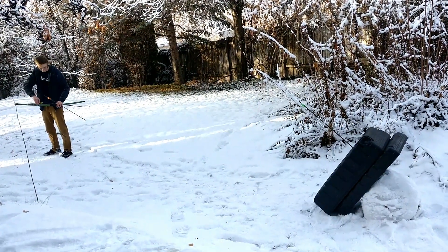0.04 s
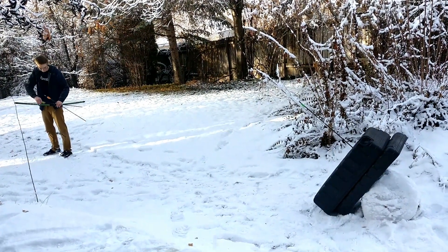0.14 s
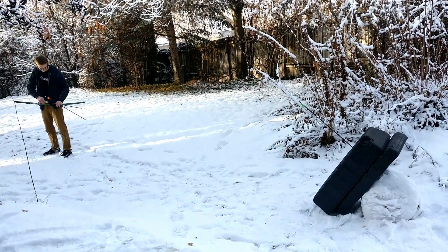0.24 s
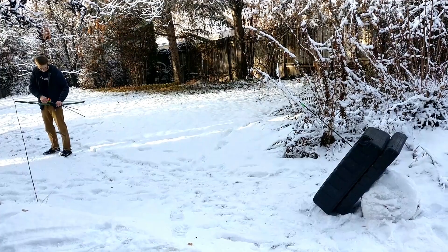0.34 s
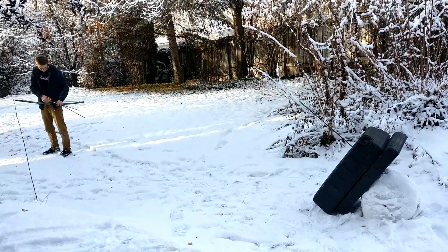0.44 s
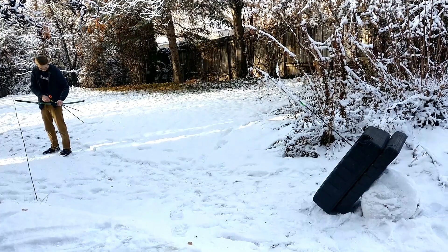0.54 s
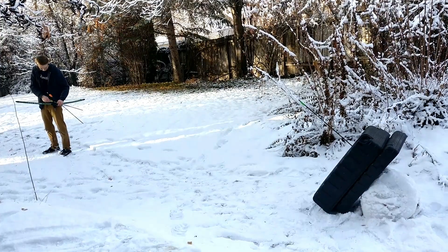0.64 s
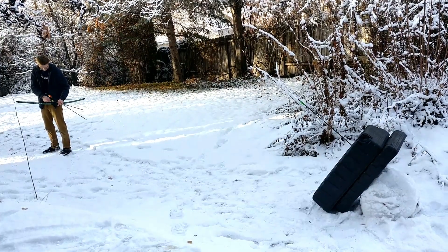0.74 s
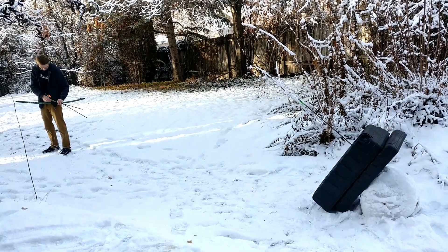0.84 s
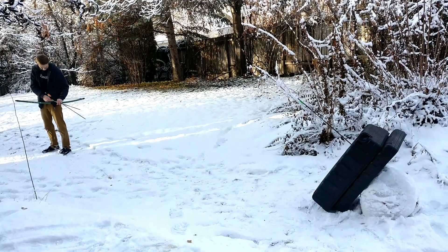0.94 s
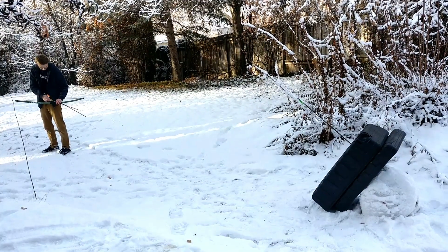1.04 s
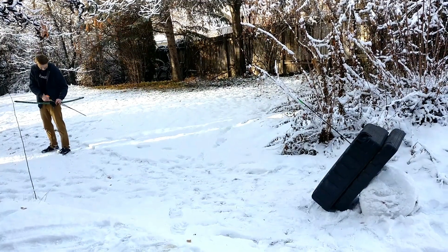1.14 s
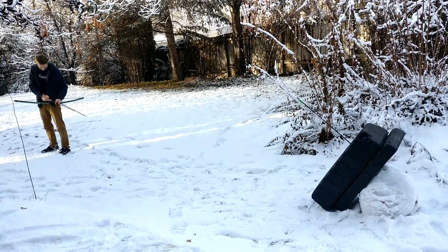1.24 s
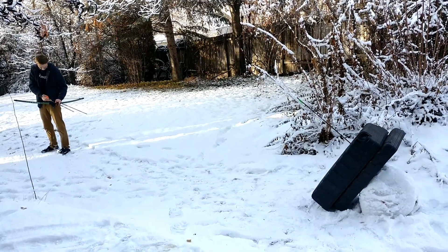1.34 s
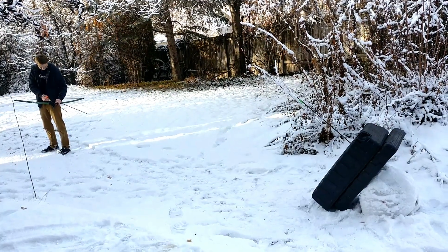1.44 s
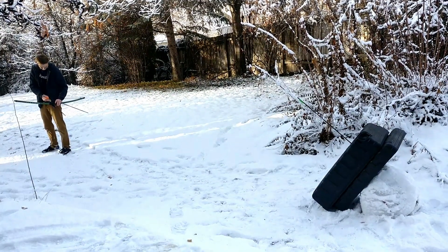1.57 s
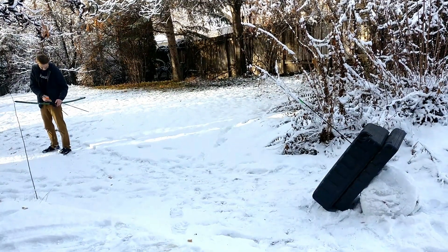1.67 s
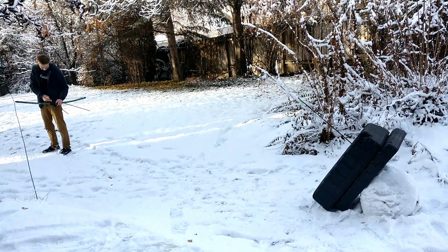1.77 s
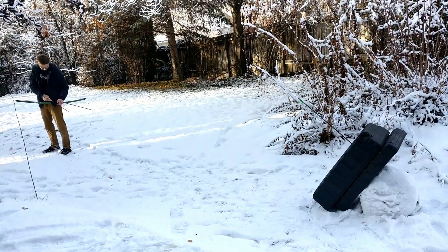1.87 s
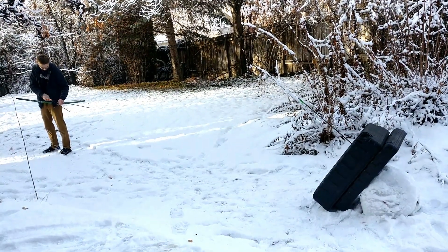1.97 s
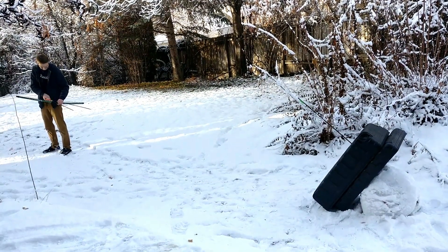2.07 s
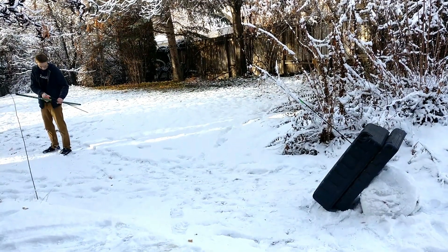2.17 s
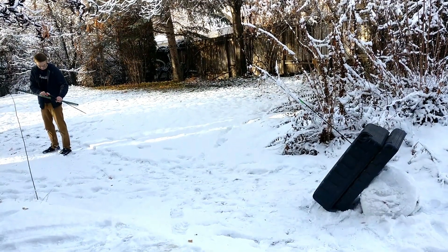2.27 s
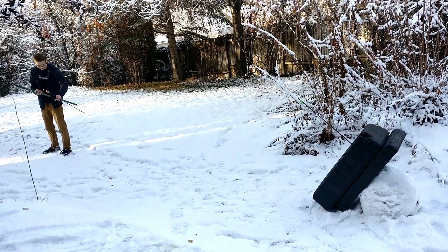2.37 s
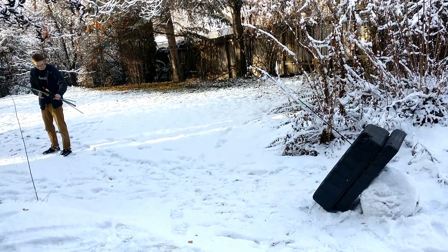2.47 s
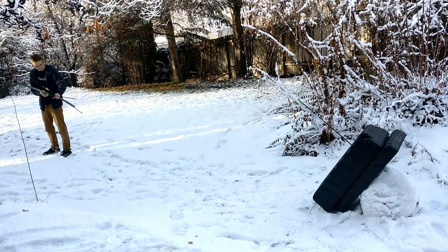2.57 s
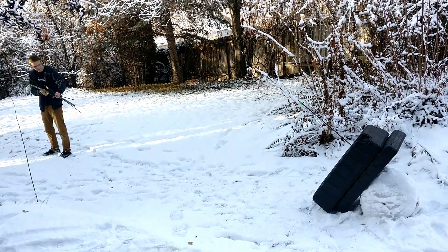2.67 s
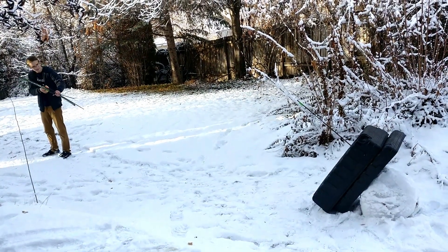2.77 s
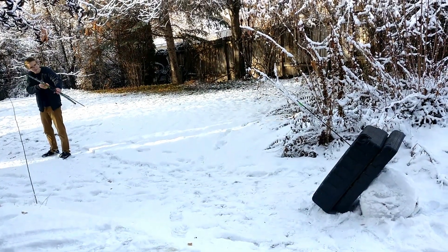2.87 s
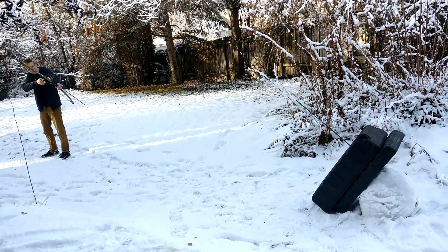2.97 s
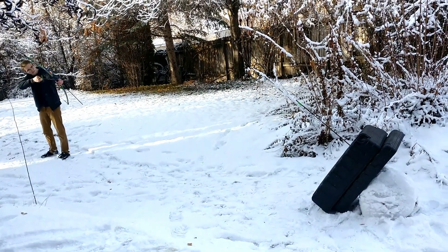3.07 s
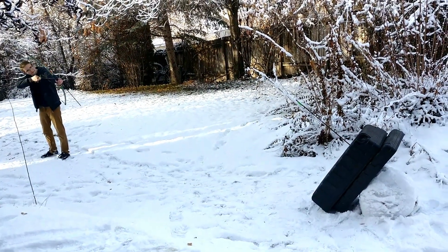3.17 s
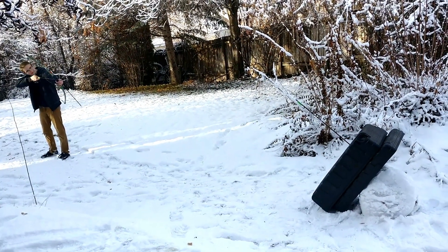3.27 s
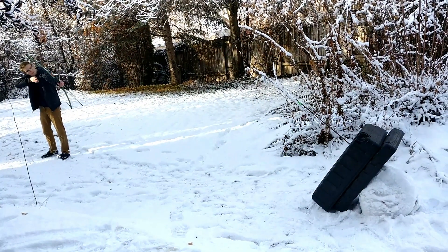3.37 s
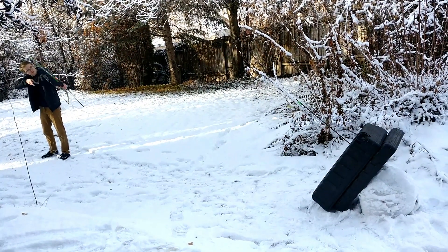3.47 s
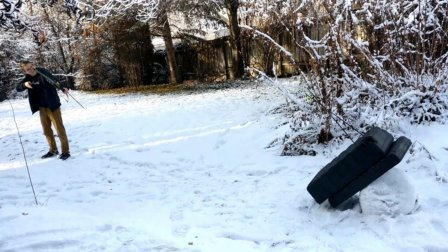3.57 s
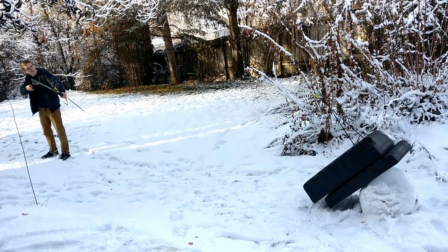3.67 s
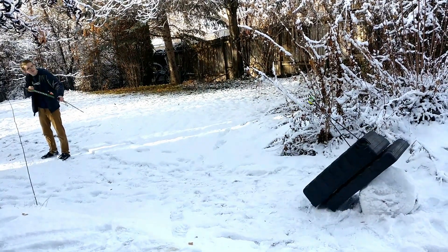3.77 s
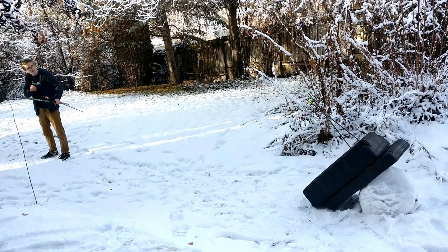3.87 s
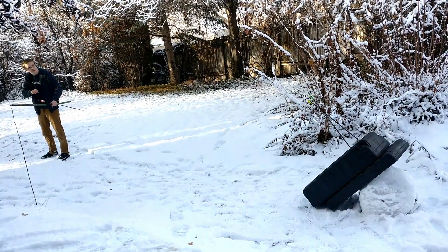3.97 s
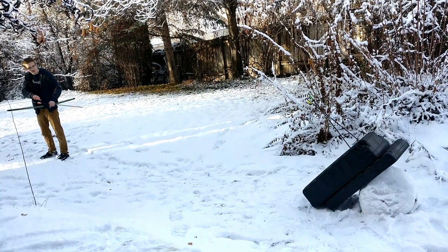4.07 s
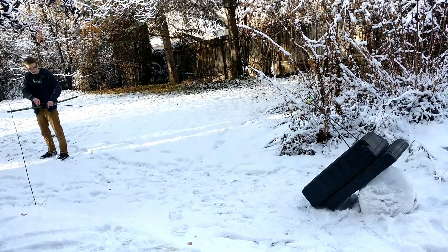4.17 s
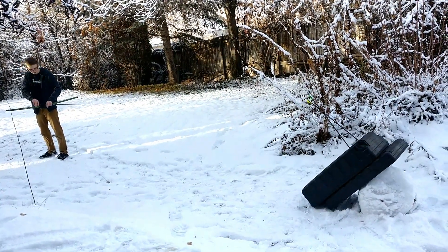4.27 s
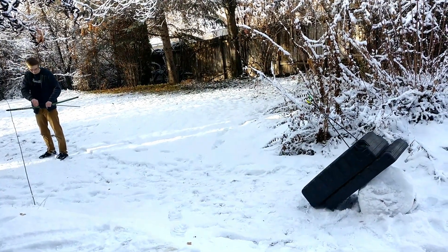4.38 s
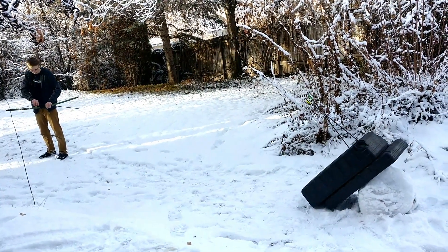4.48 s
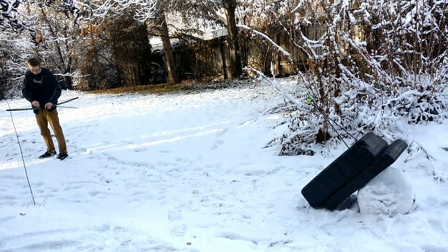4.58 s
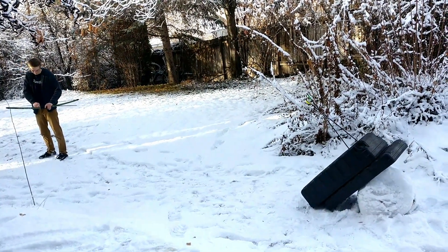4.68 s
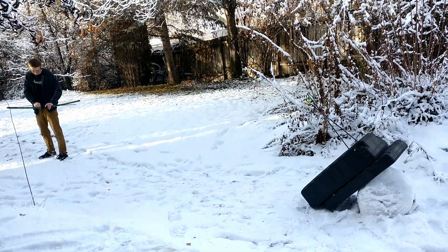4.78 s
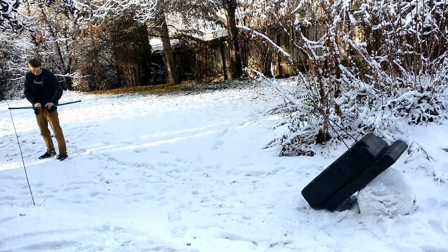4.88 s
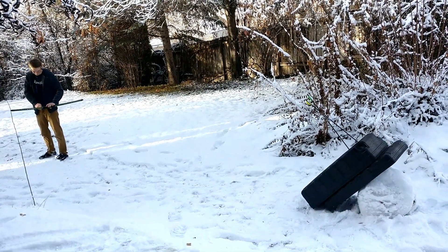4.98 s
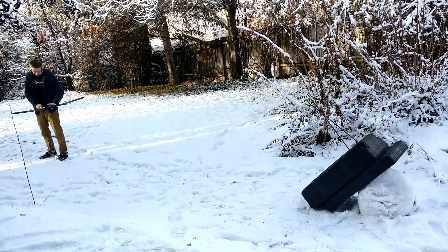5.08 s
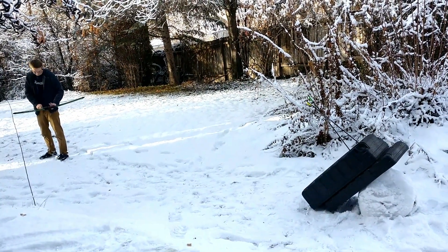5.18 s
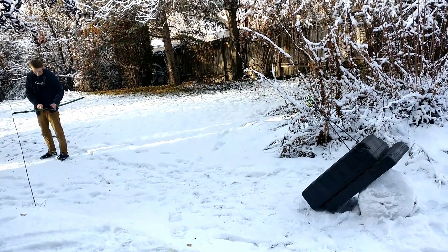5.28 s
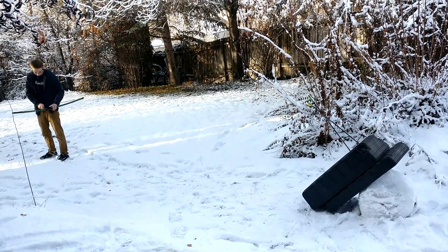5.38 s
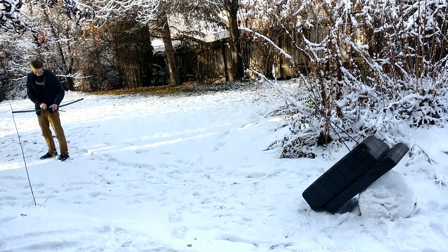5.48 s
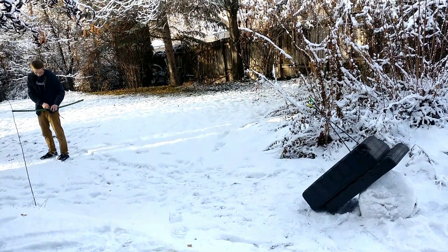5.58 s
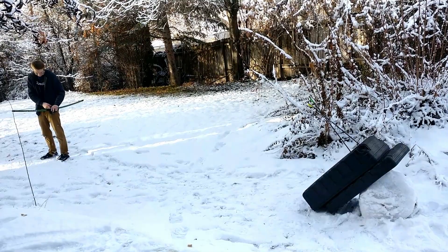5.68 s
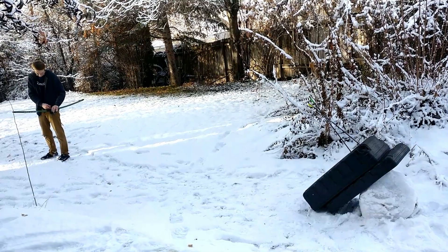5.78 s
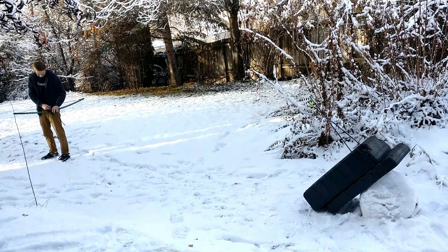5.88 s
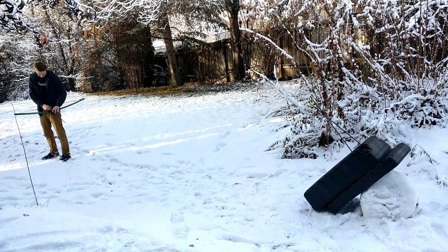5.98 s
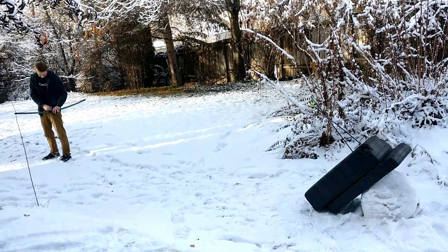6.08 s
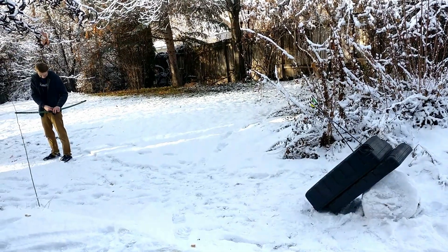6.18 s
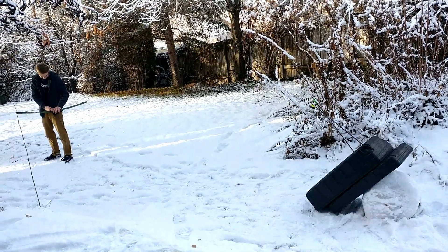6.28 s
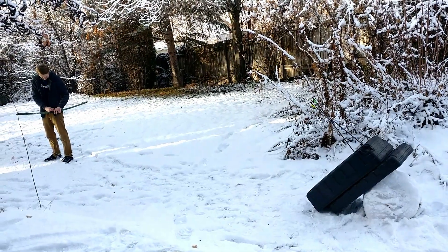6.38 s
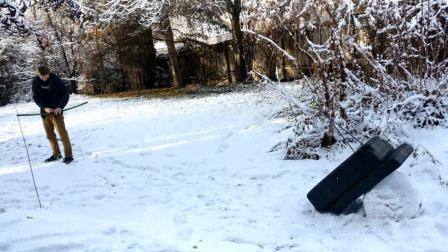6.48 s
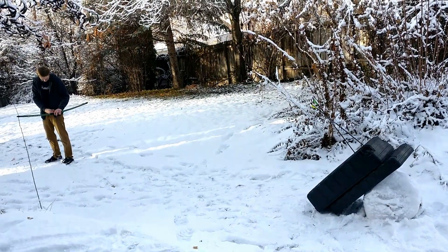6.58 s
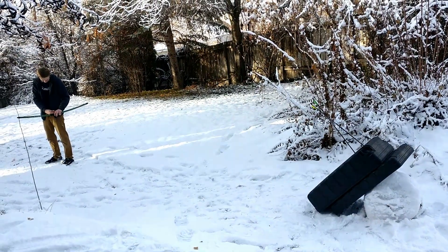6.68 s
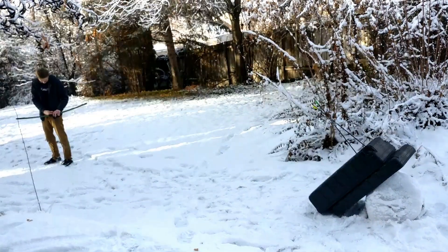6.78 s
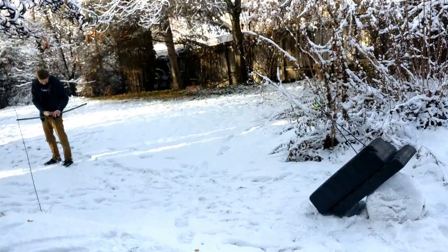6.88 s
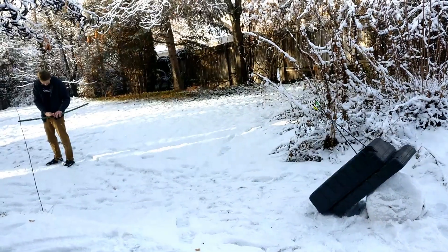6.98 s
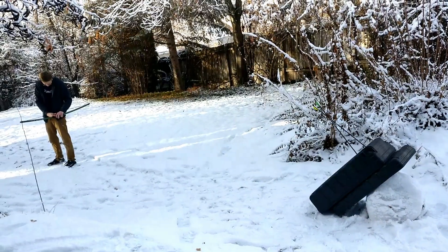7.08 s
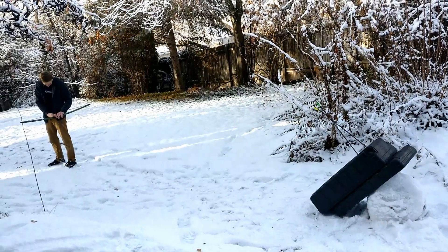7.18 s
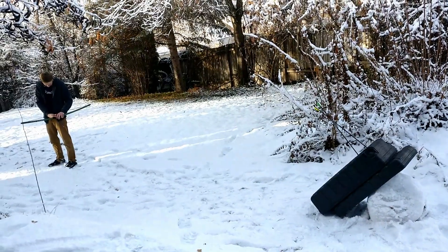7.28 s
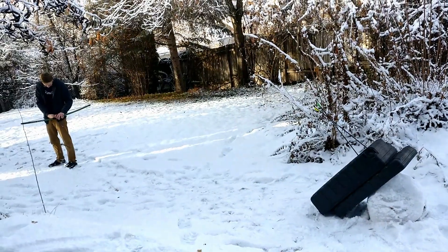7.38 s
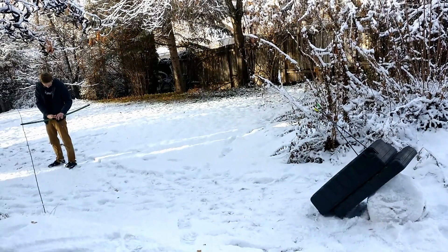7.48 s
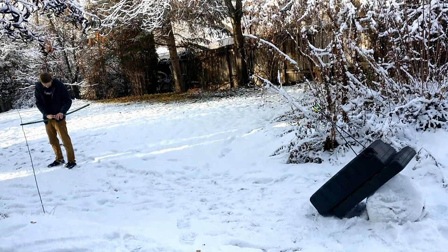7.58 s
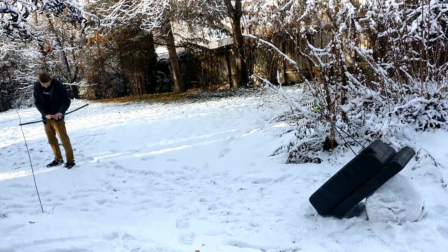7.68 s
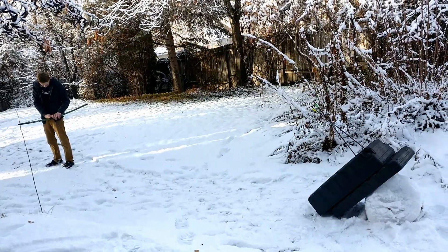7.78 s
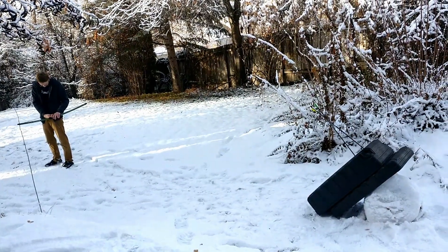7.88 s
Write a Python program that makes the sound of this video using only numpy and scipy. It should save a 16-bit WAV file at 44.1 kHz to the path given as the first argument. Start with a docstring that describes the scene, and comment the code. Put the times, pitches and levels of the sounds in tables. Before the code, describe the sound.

Outdoors in winter, an archer stands some way off, barely audible through soft cloth movements. Far traffic rumbles beneath irregular crisp drips, and an engine briefly hums. A short airy bow release leads at once into a harsh, clipped crack at a nearby hollow target block, which rocks and scrapes on packed snow with clattering slaps and low thumps. Calm returns, with ticks, faint creaks and light clicks of arrows or bow, in stereo.

```python
"""An arrow smacks a hollow block in a snowy yard, slaps and rattles; the block rocks, slides and thuds.
The release is swelling crackly noise; slaps are ragged noise driving shaft modes, thuds soft pushes
ringing block modes. Behind: far traffic and hiss as diffuse noise, a fuzzy engine tone, melt ticks as
snaps with fizz, rustles of grainy noise, and clacks, pips and creaks as rubs or slips through
resonances. A two-port microphone clips on the smack."""
import sys
import numpy as np
from scipy import signal
from scipy.fft import rfft, irfft, next_fast_len
from scipy.io import wavfile
from scipy.ndimage import uniform_filter1d

SR = 44100
rng = np.random.default_rng(int(sys.argv[2]) if len(sys.argv) > 2 else 0)


def file_out(sig):
    """Save sig as 16-bit WAV at sys.argv[1]."""
    # one column per channel
    cols = np.atleast_2d(sig).T
    # limit, then scale
    lim = np.clip(cols, -1, 1)
    pcm = np.round(lim * 32767).astype(np.int16)
    wavfile.write(sys.argv[1], SR, pcm)


N = 349713


def gain_of(db):
    """Decibels to gain."""
    return 10 ** (np.asarray(db) / 20)


def evened(x):
    """Scales to rms 1."""
    return x / np.sqrt(np.mean(x ** 2) + 1e-20)


def read(points, hz):
    """Reads a spectrum on a log-frequency axis."""
    f, value = np.transpose(points)
    return np.interp(np.log(hz + 1), np.log(f + 1), value)


def add(mix, s, sound):
    """Mixes a two-channel sound in at time s."""
    part = mix[:, round(s * SR):][:, :sound.shape[1]]
    part += sound[:, :part.shape[1]]


def coloured(x, gain_db):
    """Filters the last axis by a function of frequency giving dB."""
    hz = np.fft.rfftfreq(x.shape[-1], 1 / SR)
    return irfft(rfft(x) * gain_of(gain_db(hz)), x.shape[-1])


def sides(pan_db):
    """Left and right gains of a level difference."""
    return gain_of(np.array([[.5], [-.5]]) * pan_db)


def ring(modes, t):
    """Sum of dying modes, neighbours in opposite phase, each at a slightly shifted pitch."""
    shifts = rng.uniform(-.012, 0.018, len(modes))
    total = 0
    for k, (hz, db, t60_s) in enumerate(modes):
        tone = np.sin(2 * np.pi * hz * (1 + shifts[k]) * t)
        total = total + (-1) ** k * gain_of(db - 60 * t / t60_s) * tone
    return total


def favour(modes, spot_hz, db_per_octave):
    """The spot that is struck favours the modes near its pitch."""
    return [(hz, db - db_per_octave * abs(np.log2(hz / spot_hz)), t60_s) for hz, db, t60_s in modes]


def swell(top_s, db, rise_s, hold_s, fade_db_per_s, length_s):
    """Level curve of rise, hold and steady fade; length counts from the top."""
    rise_s, length_s = max(rise_s, .002), max(length_s, hold_s + .005)
    end_db = db - fade_db_per_s * (length_s - hold_s)
    return [(top_s - rise_s, db - 17), (top_s, db), (top_s + hold_s, db), (top_s + length_s, end_db)]


def stretch(curve, spectrum, grain_db):
    """Crackly noise on a level curve: a few grains stand well out."""
    s, db = np.transpose(curve)
    t = np.arange(s[0], s[-1], 1 / SR)
    sizes = gain_of(grain_db * np.minimum(rng.exponential(1, len(t) // 80 + 2), 4))
    grains = np.interp(np.arange(len(t)) / 80, np.arange(len(sizes)), sizes)
    noise = coloured(rng.standard_normal((2, len(t))) * grains, lambda f: read(spectrum, f))
    level = gain_of(2.5 + np.interp(t, s, db))  # 2.5 dB above the curve
    return s[0], evened(noise) * level * signal.windows.tukey(len(t), .05)


def wash(spectrum, patchy_db, shared_db):
    """Diffuse noise, its level varying by chance over time and frequency, partly shared by all bands."""
    # left-right likeness: (frequency [Hz], correlation [1])
    likeness = [(60, 0.97), (180, 0.97), (550, 0.53), (1650, -0.22), (4970, -0.03), (15000, 0.37)]
    frames, hz = N // 256 + 5, np.fft.rfftfreq(1024, 1 / SR)
    a, b, c, d, patches = rng.standard_normal((frames, 513, 5)).T
    shared = evened(uniform_filter1d(rng.standard_normal(frames), size=5))
    patches = evened(uniform_filter1d(uniform_filter1d(patches, 10, 0), 12, 1))
    same = np.clip(read(likeness, hz), -1, 1)[:, None]
    left = a + 1j * b
    right = same * left + np.sqrt(1 - same ** 2) * (c + 1j * d)
    z = np.array([left, right]) * gain_of(patchy_db * patches + shared_db * shared)
    x = signal.istft(z, nperseg=1024, noverlap=768)[1][:, :next_fast_len(N)]
    return evened(coloured(x, lambda f: read(spectrum, f))[:, :N])


def yard():
    """Three traffic layers on their own swells over an unsteady hiss."""
    # far traffic: (time [s], rumble [dB], engine drone [dB], tyre wash [dB])
    traffic = [(0.0, -48.5, -55.5, -59.5), (0.77, -46.5, -57, -57), (1.27, -44, -56, -55),
               (1.8, -44, -57.5, -52.5), (2.3, -43.5, -54.5, -55), (2.59, -49, -54.5, -55.5),
               (3.0, -46, -52, -54.5), (3.4, -45, -51.5, -57), (4.1, -44.5, -52, -56.5),
               (4.55, -46.5, -59, -60), (5.3, -47.5, -58, -58.5), (6.4, -49, -59, -60),
               (7.0, -49.5, -54, -59), (7.59, -48, -53, -54), (7.93, -53.5, -56, -56)]
    # noise spectra: (frequency [Hz], relative density [dB per Hz])
    rumble_spectrum = [(12, -48), (20, -23), (48, 2.5), (81, 4), (101, 3), (134, -10), (208, -15.5),
                       (278, -23.5), (400, -21.5), (520, -55), (880, -120)]
    drone_spectrum = [(90, -30), (130, 1.5), (200, 0), (280, -7.5), (400, -35)]
    tyre_spectrum = [(150, -34.5), (250, -13.5), (467, -6.5), (908, -2.5), (1300, -7.5), (1810, -8),
                     (4720, -30), (6000, -39.5), (7800, -52), (13200, -120)]
    hiss_spectrum = [(1470, -29), (2500, 1), (4740, -5), (6000, -5), (6700, -12.5), (7550, -21.5),
                     (9490, -8.5), (13700, -7.5), (15100, -12.5), (16100, -2.5), (16500, -37)]
    hiss_db = -65
    s, *levels = np.transpose(traffic)
    rumble, drone, tyres = (gain_of(np.interp(np.arange(N) / SR, s, db)) for db in levels)
    out = rumble * wash(rumble_spectrum, 0.41, .1)
    out += drone * wash(drone_spectrum, .8, .1)
    out += tyres * wash(tyre_spectrum, 1.7, .4)
    return out + gain_of(hiss_db) * wash(hiss_spectrum, 3.4, 1.6)


def engine():
    """A passing engine's fuzzy tone: a carrier on the pitch curve under slow chance swings."""
    # engine note: (time [s], pitch [Hz], level [dB])
    note = [(1.199, 206.6, -52.5), (1.4, 222.4, -56.5), (1.55, 215.1, -49), (1.75, 200, -50),
            (1.95, 187.8, -52.5), (2.2, 185, -56)]
    s, hz, db = np.transpose(note)
    t = np.arange(s[0], s[-1], 1 / SR)
    swing = uniform_filter1d(uniform_filter1d(rng.standard_normal((len(t), 2)).T, 900), 900)
    carrier = np.exp(2j * np.pi * np.cumsum(np.interp(t, s, hz)) / SR)
    tone = ((swing[0] + 1j * swing[1]) * carrier).real
    level = gain_of(np.interp(t, s, db)) * signal.windows.tukey(len(t), .3)
    return s[0], evened(tone) * level * np.ones((2, 1))


def tick(db, pan_db, ring_hz, body_db, fizz_db):
    """A millisecond snap and a spit of fizz, with a hint of pitch from the twig or crust."""
    t = np.arange(4096) / SR

    def spit_db(f):
        below_treble = body_db * np.clip(np.log2(8000 / (f + 1)), 0, 2)
        pitch = 9 / (1 + ((f - ring_hz) / 350) ** 2)
        return -40 * (f < 1900) + below_treble - 7 * (abs(f - 7700) < 1000) + pitch

    spit = coloured(rng.standard_normal((2, len(t))), spit_db)
    snap = np.exp(-((t - .0013) / 0.00033) ** 2)
    decay = gain_of(-60 * t / .045) + gain_of(-14 - 60 * t / 0.32)  # short fizz and a weaker tail
    fizz = (1 - np.exp(-t / 0.00054)) * decay
    return gain_of(db - 3) * sides(pan_db) * evened(spit) * (snap + gain_of(fizz_db) * fizz)


def melt():
    """Drips and falling snow crumbs: clear ticks and a scatter of fainter, softer ones."""
    # clear ticks: (time [s], nominal peak [dB], left-right [dB], ring [Hz],
    # gain below the treble [dB per octave])
    ticks = [(0.0695, -42, -3, 2020, -2.5), (0.1113, -39, 0.5, 2380, 0), (0.2289, -44, -11, 2050, -8),
             (0.6424, -42.5, 6, 5360, -15), (0.766, -39.5, -9, 4400, -3.5), (0.794, -36, 1, 6600, -8),
             (1.006, -47.5, -8, 2900, 7), (1.12, -46, 9, 2450, -6), (1.418, -40, 8.5, 3300, 2),
             (1.7699, -47, -2, 3550, 6), (1.8358, -42, -0.5, 2430, -1.5), (1.9666, -40.5, 3, 2470, 5),
             (2.1378, -45, -0.5, 3410, -5), (2.212, -41, 0, 3520, -6), (2.491, -38.5, 0, 2240, -3),
             (2.58, -35, 6, 3520, 0), (2.7322, -41, -4, 2600, 6), (3.0724, -43, 2, 2040, 0),
             (3.3732, -46, -14, 2340, 0.5), (3.4196, -34, 1.5, 2220, 1), (4.0965, -43.5, -10.5, 3260, 3.5),
             (4.174, -38.5, -11.5, 4600, 1.5), (4.2934, -41, -10.5, 5140, -1),
             (4.356, -36.5, 5, 6100, -2.5), (4.3754, -27.5, -4, 5000, -1), (4.4276, -31.5, 2, 7310, -2),
             (4.434, -33, -8.5, 5920, -0.5), (4.56, -42.5, -6, 3000, -2), (4.6434, -34, 6, 2480, -1),
             (4.6783, -46, -13, 2440, -1), (4.8417, -44, -2.5, 4540, -2.5), (5.4206, -31.5, 3, 2300, -6.5),
             (5.6314, -35, 1.1, 2720, -2.5), (5.808, -42.5, -5, 6030, -1.5), (6.0863, -47, -0.5, 2275, 2),
             (6.178, -41, -7, 5300, -4), (6.375, -33, 2, 4800, -5.5), (6.8673, -45, 3, 3423, 0),
             (7.224, -34, 2, 2000, -5), (7.4041, -46.5, -6, 2240, -1), (7.5524, -45.5, -8, 2490, 5),
             (7.598, -37.5, 3, 2060, -5), (7.8082, -43.5, 7.5, 3590, -6), (7.8355, -39, 6, 8580, -9),
             (7.9129, -45.5, -10.5, 2490, -3.5)]
    crumbs_per_s, faintest_crumb_db = 11, -56
    tick_fizz_db, crumb_fizz_db = -8, -1.5  # against the snap
    out = np.zeros((2, N))
    for s, *row in ticks:
        add(out, s, tick(*row, tick_fizz_db))
    for when, size, side, pitch in rng.random((round(crumbs_per_s * N / SR), 4)):
        db, pan_db, ring_hz = faintest_crumb_db + 7 * size, 12 * side - 6, 2500 * 5 ** pitch
        add(out, when * N / SR, tick(db, pan_db, ring_hz, -3.0, crumb_fizz_db))
    return out


def rustle(*row):
    """Sleeve cloth: grainy noise that swells and fades."""
    # cloth spectrum: (frequency [Hz], relative density [dB per Hz])
    cloth = [(290, -40), (500, -1), (627, -31), (818, -3), (3130, -6.5), (3820, -7.5), (8050, -23),
             (12000, -15.5), (15600, -45), (22000, -120)]
    return stretch(swell(*row), cloth, 2.3)


def creak(length_s, rate, db, pan_db, hz, upper_db):
    """Chance slips, weakening as they go, ring three close resonances."""
    t, along = np.arange(2500) / SR, np.linspace(0, 1, round(length_s * SR))
    slipping = rng.random(len(along)) < 3 * rate / SR
    slips = rng.standard_normal(len(along)) * slipping * gain_of(-8 * along)
    body = ring([(hz, 0, .02), (1.31 * hz, upper_db, .03), (1.57 * hz, upper_db - 6, .03)], t)
    return gain_of(db) * sides(pan_db) * signal.fftconvolve(slips, body)


def pip(db, pan_db, hz):
    """A tiny rub rings a pair of short resonances."""
    t = np.arange(1500) / SR
    rub = rng.standard_normal(len(t)) * gain_of(-60 * t / .012)
    body = signal.fftconvolve(rub, ring([(hz, 0, .013), (1.1 * hz, -3, .009)], t))
    return gain_of(db) * sides(pan_db) * body / abs(body).max()


def clack(db, pan_db, hold):
    """A short scrape of contact rings the bow and trails off in the yard."""
    # bow modes: (frequency [Hz], level [dB], t60 before the hold factor [s])
    bow = [(1120, -2.5, .05), (1870, -0.5, 0.057), (2300, -4.5, .04), (2630, -2.5, 0.063), (3620, -9, .04),
           (4320, 1.5, 0.053), (5100, -3, 0.033), (6110, -1.5, .03), (6700, -0.5, 0.027)]
    t = np.arange(9000) / SR
    modes = [(hz, level, t60_s * hold) for hz, level, t60_s in bow]
    decay = gain_of(-60 * t / 0.025) + gain_of(-17.5 - 60 * t / .5)
    scrape = rng.standard_normal((2, len(t))) * decay
    body = signal.fftconvolve(scrape, ring(modes, t)[None], axes=1)[:, :len(t)]
    raw = coloured(scrape, lambda f: -30 * (f < 900) - 5 * (f > 5000) - 8 * (f > 7000))
    both = body / abs(body).max() + gain_of(-.5) * raw / abs(raw).max()
    return gain_of(db) * sides(pan_db) * both


def release():
    """String release and arrow flight: one quick swell of grainy noise."""
    # swell: loudest at [s], level [dB], rise [s], hold [s], fade [dB per s], length [s]
    flight = (3.441, -34, 0.01, 0.0275, 210, 0.1)
    # release spectrum: (frequency [Hz], relative density [dB per Hz])
    twang = [(350, -48.5), (600, -14.5), (935, -15), (1000, 2.5), (1380, -25.5), (1790, 1.5), (3490, -8),
             (5990, -3), (7580, -20.5), (8360, -11.5), (15200, -19.5), (15800, -16), (16500, -31.5)]
    return stretch(swell(*flight), twang, 1.8)


def slide():
    """Snow crunches under the sliding block: noise with strongly uneven grains."""
    # slide level: (time [s], level [dB])
    sliding = [(3.575, -24.5), (3.73, -29), (3.79, -35.5), (3.845, -37.5), (3.86, -46.5), (3.93, -49.5),
               (3.95, -43.5), (4.03, -67)]
    # snow spectrum: (frequency [Hz], relative density [dB per Hz])
    crunch = [(180, -29), (300, -0.5), (504, -15.5), (986, -5), (1660, -6.5), (3900, -7), (6890, -22.5),
              (14400, -19.5), (15700, -30), (16500, -43.5)]
    return stretch(sliding, crunch, 4.2)


def thud(db, spot_hz, free_s):
    """A soft push crushes snow and rings the hollow block until it beds in and is muffled."""
    # block modes: (frequency [Hz], level [dB], t60 [s])
    block = [(68, -8, .12), (96, -3, 0.18), (135.2, -3.5, .18), (167.5, -1.5, 0.13), (194.1, -1.5, 0.074),
             (226, -2, .15), (259, -3, .12), (316.4, 0, 0.21), (397, -5, .06), (474, -5, 0.059),
             (576.6, -10, 0.064)]
    contact_cycles, crush_db = .36, -14  # push length in cycles of the favoured pitch
    t = np.arange(12000) / SR
    push = np.hanning(max(round(contact_cycles / spot_hz * SR), 4))
    body = signal.fftconvolve(push, ring(favour(block, spot_hz, 36), t))[:len(t)]
    noise = 0.35 * rng.standard_normal((2, len(t))) + rng.standard_normal(len(t))
    crush = coloured(noise, lambda f: -24 * abs(np.log2(f / 290 + .01)))
    crush = gain_of(crush_db - 60 * t / .12) * np.minimum(t / .003, 1) * evened(crush)
    muffled = gain_of(-14 / (1 + np.exp(-(t - free_s) / 0.0015)))
    return gain_of(db) * sides(-.3) * (body / abs(body).max() + crush) * muffled


def slap(db, pan_db, t60_s, tilt_db, ring_db, spot_hz):
    """A bright snap and a ragged crack, its treble dying first, that also drives the modes of shaft and shell."""
    # crack spectrum: (frequency [Hz], relative density [dB per Hz])
    crack_spectrum = [(240, -49), (400, -12.5), (912, -16.5), (1030, -1.5), (1600, -13), (2020, -2.5),
                      (2360, -11), (3760, -11.5), (7340, -20.5), (15000, -25.5), (16500, -33.5)]
    # shaft and shell modes: (frequency [Hz], level [dB], t60 [s])
    shaft = [(689.4, -8, .06), (798, -3.5, 0.061), (1059, -1, 0.079), (1297, -10.5, 0.057),
             (1748, -2.5, 0.044), (2085, 2, 0.061), (2684, -7.5, .06), (3690, -6, 0.053), (4270, -6.5, .05),
             (5330, -20.5, 0.037), (6200, -10.5, 0.028)]
    hard_rise_ms, softer_ms_per_db = .6, .09  # weaker slaps rise more slowly
    snap_db, snap_t60_s, snap_left_db, snap_hz = 2.5, .007, 10, 10010  # first contact
    snap_fade_db_per_db = 0.76  # weaker slaps snap less
    shade_db = 4  # the right port is shaded from the treble
    t = np.arange(8192) / SR
    common, left, right, drive, rag = rng.standard_normal((5, len(t)))
    rise = 1 - np.exp(-t * 1000 / max(hard_rise_ms - softer_ms_per_db * db, .1))
    ragged_db = 2.4 * evened(uniform_filter1d(rag, 90))
    shape = rise * gain_of(-60 * t / max(t60_s, .01) + ragged_db)

    # the ports differ mostly at short wavelengths
    apart = coloured(np.array([left, right]), lambda f: -8 / (1 + (f / 2500) ** 4))
    crack = evened(coloured(.5 * common + apart,
                            lambda f: read(crack_spectrum, f) + tilt_db * np.log2(f / 3000 + .05)))
    treble = coloured(crack, lambda f: -60 * (f < 6800))
    crack = crack - treble * (1 - gain_of(-60 * t / 0.18) * sides(shade_db))

    snap = evened(coloured(apart, lambda f: -22 * abs(np.log2(f / snap_hz + .01))))
    snap = snap * gain_of(snap_db - 60 * t / snap_t60_s) * np.minimum(t / .0002, 1) * sides(snap_left_db)
    snap_fade_db = snap_fade_db_per_db * db + 1.5 * min(tilt_db - 2, 0)  # duller slaps snap less too

    kick = (0.56 + drive) * rise * gain_of(-60 * t / .012)
    modes = signal.fftconvolve(kick, ring(favour(shaft, spot_hz, 10), t))[:len(t)]
    modes = np.array([modes, np.pad(modes, (3, 0))[:len(t)]])  # the far port hears the ring a little later
    modes = gain_of(ring_db + 8.5) * modes / abs(modes).max()
    return gain_of(db - 8) * sides(pan_db) * (crack * shape + snap * gain_of(snap_fade_db) + modes)


def scene():
    """Yard, engine, melt, archer, release, slide, thuds and slaps."""
    # sleeve rustles: (loudest at [s], level [dB], rise [s], hold [s], fade [dB per s], length [s])
    rustle_rows = [(0.412, -58.5, .03, .005, 250, .06), (1.012, -60, .04, .003, 400, .04),
                   (1.616, -54, .03, .005, 130, .066), (1.883, -60, .2, .003, 600, .016),
                   (3.014, -53.5, .09, 0.018, 110, .14), (3.218, -59, .06, .005, 350, 0.053),
                   (4.584, -58.5, .03, .003, 600, .026), (5.404, -58.5, .015, .015, 450, .055),
                   (5.646, -59.5, .01, .005, 89.5, .065), (5.78, -59.5, .07, .005, 200, .06),
                   (6.382, -58.5, .004, .003, 170, .07), (6.867, -61.5, .01, .003, 260, .06),
                   (7.174, -59, 0.044, 0.043, 200.5, .1)]
    # faint creaks: (time [s], length [s], a third of the slip rate [1/s], level [dB],
    # left-right [dB], lowest ring [Hz], upper rings [dB])
    creak_rows = [(4.565, .04, 500, -66, -8, 3050, -9), (5.246, .115, 500, -64, -8, 2900, -4)]
    # short pips from the gear: (time [s], peak [dB], left-right [dB], pitch [Hz])
    pip_rows = [(4.6442, -43.5, 4.0, 2460), (5.0638, -50, -3.5, 2700), (5.0916, -45.5, -4.0, 2570),
                (5.127, -47, -4.5, 2630), (5.1544, -53.5, -6, 2490), (5.255, -50.5, -11, 2970),
                (5.3911, -46.5, -3.5, 2300)]
    # bow and spare shafts handled: (time [s], nominal peak [dB], left-right [dB], t60 factor [1])
    clack_rows = [(5.5969, -32.5, -0.5, 0.63), (5.6122, -36.5, -5, 0.44)]
    # block rocking on packed snow: (time [s], nominal peak [dB], favoured pitch [Hz], free ringing [s])
    thud_rows = [(3.567, -14, 293, .15), (3.566, -13, 118, .03), (3.576, -9.5, 205, 0.036),
                 (3.592, -14, 137, 0.022), (3.619, -21, 165, .034), (3.64, -24, 314, .06),
                 (3.673, -15.5, 115, 0.04), (3.7, -15.5, 185, 0.047), (3.738, -13, 204, 0.019),
                 (3.758, -15, 187, 0.035), (3.797, -23.5, 163, 0.057), (3.87, -39, 125, .05),
                 (3.9, -39, 135, .04), (3.938, -20, 166, 0.044), (3.982, -22, 167, 0.022),
                 (4.025, -34.5, 150, .051)]
    # arrow against the block: (time [s], nominal peak [dB], left-right [dB], crack t60 [s],
    # brightness [dB per octave], relative shaft ring [dB], favoured pitch [Hz])
    slap_rows = [(3.5635, -8.5, 8.5, 0.1, 9, -0.5, 2000), (3.567, -2, -2.5, 0.065, -4, -1.5, 2000),
                 (3.577, -6, -1, 0.061, -10, -3, 796), (3.589, -16, -2, 0.058, 8, -10, 1000),
                 (3.6073, -2, 1.5, .088, 3.5, -10, 2720), (3.63, -12, -4, 0.056, 8, -9, 6450),
                 (3.651, -2.5, -1, .11, 2.5, -6, 1080), (3.674, -8.5, -3, .091, 5, -19, 4300),
                 (3.6994, -5.5, 4, .05, 1.5, -17.5, 1040), (3.752, -18, 3, .11, -0.5, -8, 1040),
                 (3.775, -24, 3, .05, -5, -5, 850), (3.815, -27, 4, .074, 2, -3, 1845),
                 (3.832, -22, 1.5, .11, -2, -5, 1060), (3.906, -35, 2, 0.068, 3, -9, 1260),
                 (3.945, -30, 2, .054, 1, -4.5, 900), (3.989, -28.5, .4, .06, -4, -11.5, 850)]
    out = yard()
    add(out, *engine())
    out += melt()
    for row in rustle_rows:
        add(out, *rustle(*row))
    add(out, *release())
    add(out, *slide())
    for rows, source in [(creak_rows, creak), (pip_rows, pip), (clack_rows, clack),
                         (thud_rows, thud), (slap_rows, slap)]:
        for s, *row in rows:
            add(out, s, source(*row))
    return out


def record(dry):
    """The capsule loses the deepest bass, the converter clips at full scale; then the band limit."""
    mic_low_hz, edge_hz = 36.3, 16450
    capsule = signal.butter(2, mic_low_hz, "high", fs=SR, output="sos")
    clipped = np.clip(signal.sosfilt(capsule, dry), -1, 1)
    band = signal.firwin(255, edge_hz, window=("kaiser", 9), fs=SR)
    return np.clip(signal.oaconvolve(clipped, band[None], "same"), -1, 1)


dry = scene()
out = record(dry)
file_out(out)
```